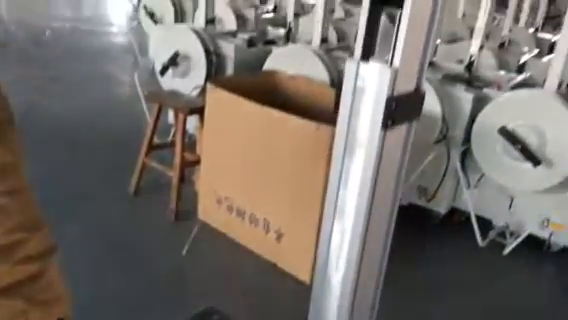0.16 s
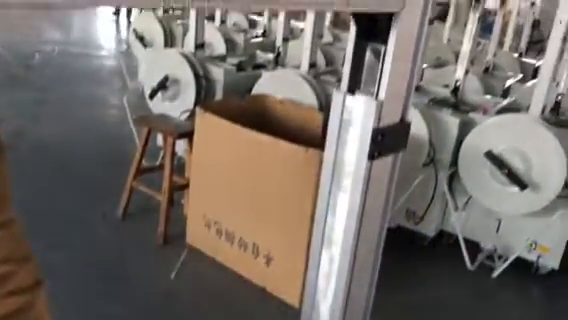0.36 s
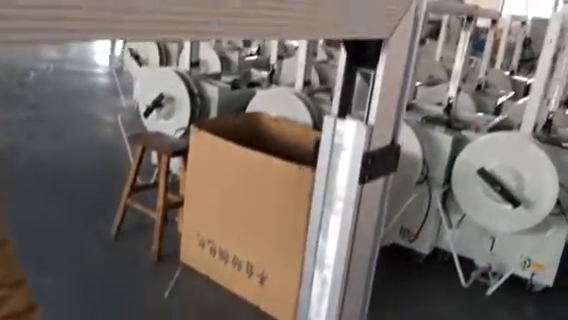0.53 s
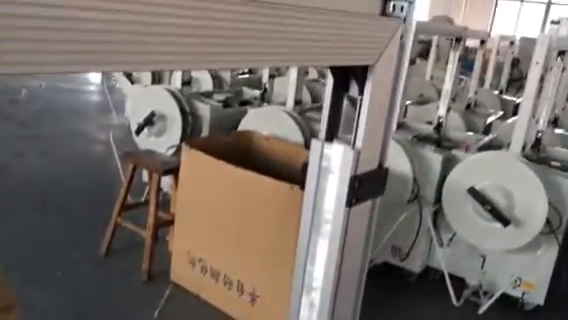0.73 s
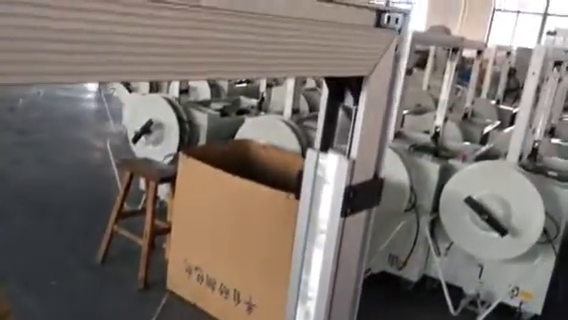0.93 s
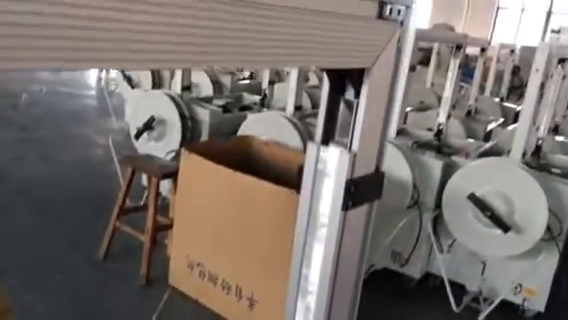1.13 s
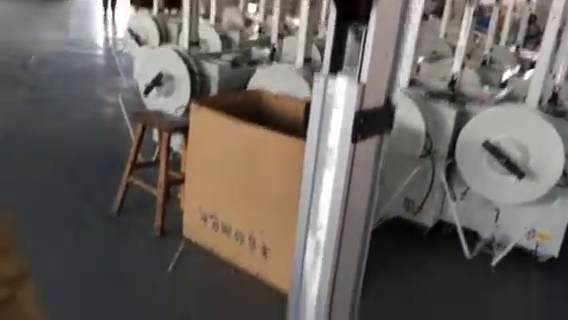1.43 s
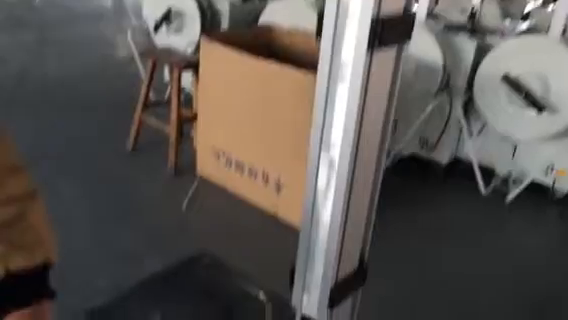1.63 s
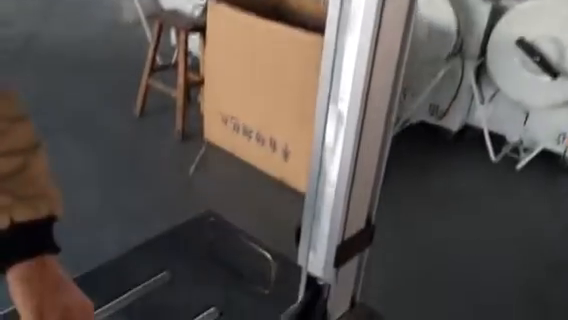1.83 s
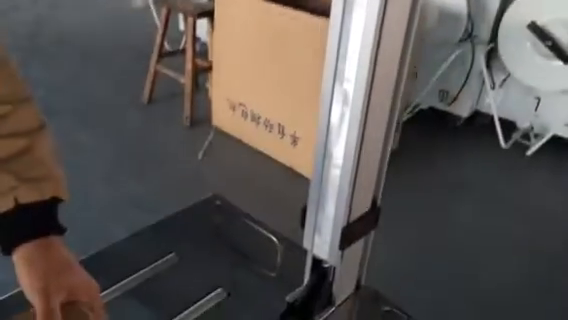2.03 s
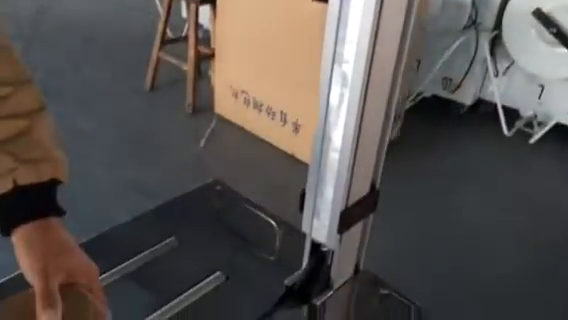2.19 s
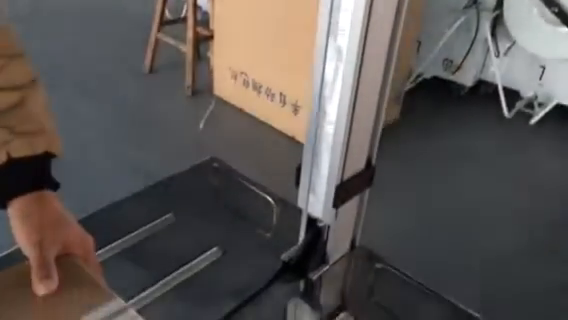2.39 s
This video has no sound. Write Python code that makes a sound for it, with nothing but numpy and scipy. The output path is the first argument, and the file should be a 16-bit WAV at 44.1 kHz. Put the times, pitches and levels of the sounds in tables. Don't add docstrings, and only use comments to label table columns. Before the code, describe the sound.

A strapping machine runs close by in a reverberant workshop with low fan murmur. Latches clack with a heavy thump around 0.2-0.4 s. From 0.45 to 1.05 s a high gear whine and growing strap hiss end in a sharp snap. At 1.27-1.8 s, strap tightens with loud whine, rattle, dense clatter and cracks. Quiet carton bumps and slides follow from 1.95 to 2.35 s.

```python
import sys
import numpy as np
from scipy import signal
from scipy.io import wavfile
from scipy.ndimage import uniform_filter1d

SR = 44100
rng = np.random.default_rng(int(sys.argv[2]) if len(sys.argv) > 2 else 0)


def convert_level_to_amplitude(level_db):
    exponent = np.asarray(level_db, float) / 20
    return 10 ** exponent


def digitize_waveform(pressure):
    field = np.atleast_2d(pressure).T
    bounded = np.clip(field, -1, 1)
    quanta = np.round(bounded * 32767).astype(np.int16)
    wavfile.write(sys.argv[1], SR, quanta)


N = 112454

# time_s [s], mesh_pitch_hz [Hz], level_db [dB]
IDLE_RUN = [(0, 1842, -42.5), (1.3, 1817, -52.5), (1.75, 1836, -35), (1.92, 1831, -37), (2.1, 1827, -35),
            (2.55, 1854, -45.5)]
# time_s [s], mesh_pitch_hz [Hz], level_db [dB]
LOADED_RUNS = [
    [(.43, 1570, -36), (.47, 1780, -31), (.52, 1872, -30.5), (.87, 1850, -32), (.915, 1766, -21.5),
     (.96, 1734, -24), (1.0, 1850, -36), (1.04, 1850, -27), (1.048, 1810, -35)],
    [(1.27, 1530, -30), (1.315, 1770, -17), (1.34, 1717, -28), (1.44, 1820, -20.5), (1.6, 1833, -19.5),
     (1.66, 1858, -23), (1.725, 1857, -21), (1.76, 1724, -28), (1.8, 1723, -33)],
]
# multiple [1], level_db [dB]
MESH_OVERTONES = [(2, -3), (3, -19), (4, -17)]
# frequency_hz [Hz], density_db [dB per Hz]
MURMUR_SPECTRUM = [(76, -42), (130, -9.5), (307, -9), (527, -24.5), (726, -18.5), (1080, -19),
                   (1820, -23.5), (2100, -25), (15500, -57.5)]
# time_s [s], level_db [dB]
RUMBLE_LEVEL = [(0, -44.5), (.35, -42.5), (.6, -42), (1.3, -44.5), (1.6, -42), (1.7, -68), (2.02, -63),
                (2.1, -34), (2.55, -44.5)]
# start_s [s], peak_db [dB], body_db [dB], sizzle_db [dB], length_s [s]
MACHINE_CONTACTS = [(.197, -22, -4.5, -12.5, 0.039), (.252, -26, -3.5, -37, 0.043),
                    (.287, -15, -10.5, -22, 0.036), (.311, -8.5, -4.5, -40, 0.0031),
                    (.388, -8.5, -11, -13.5, 0.033), (.514, -24.5, -19, -6, 0.048),
                    (.637, -23.5, -33, -2.5, 0.009), (.897, -12.5, -24, -19, 0.031),
                    (.937, -12, -43, -21, 0.049), (1.0475, -9.5, -25, -11.5, 0.024),
                    (1.11, -19.5, -14.5, -32, 0.047), (1.146, -16.5, -13.5, -45, 0.019),
                    (1.275, -6.5, -40, -8, 0.05), (1.329, -7, -20, -11, 0.027),
                    (1.354, -5.5, -14, -14.5, 0.013), (1.426, -8, -11, -9.5, 0.02),
                    (1.474, -7, -9.5, -25, 0.024), (1.532, -17, -31, -5, 0.015),
                    (1.552, -5.5, -14, -27, 0.012), (1.579, -4.5, -19, -33, 0.014),
                    (1.626, -18.5, 4.5, -16, 0.0046), (1.7225, -12, 0.5, -22, 0.0043),
                    (1.736, -20.5, 6, -40, 0.0033)]
# frequency_hz [Hz], width_hz [Hz], level_db [dB]
HOUSING_MODES = [(1454, 19, 10.5), (1700, 64, 9), (1850, 660, 2.5), (2536, 92, 9), (2697, 49, 5.5),
                 (2960, 130, 9.5), (3540, 1640, -0.5)]
# start_s [s], level_db [dB], pitch_hz [Hz], length_s [s]
RINGING_PARTS = [(.198, -38.5, 10700, 0.022), (.2, -30.5, 720, 0.034), (0.309, -21, 5460, 0.0046),
                 (0.311, -19.5, 1270, 0.0062), (0.39, -34, 9600, 0.019), (.4, -28.5, 1050, 0.027),
                 (0.515, -30, 7230, 0.006), (0.901, -30, 1650, 0.013), (0.941, -23, 1630, 0.021),
                 (0.944, -32, 2540, .015), (1.056, -38, 2330, 0.013), (1.273, -18, 3870, 0.011),
                 (1.281, -15, 2690, .004), (1.302, -17.5, 5940, 0.0086), (1.308, -24, 4100, .012),
                 (1.314, -18, 8300, .012), (1.326, -30, 2800, .008), (1.359, -19, 2950, 0.0062),
                 (1.355, -30, 5600, 0.0046), (1.364, -23, 3240, .007), (1.409, -20.5, 490, 0.0056),
                 (1.427, -22, 1090, 0.018), (1.43, -18.5, 9670, .012), (1.45, -21.5, 8900, 0.0096),
                 (1.474, -28, 5960, 0.0036), (1.482, -19.5, 1170, 0.012), (1.531, -23.5, 7950, 0.0086),
                 (1.536, -21.5, 2790, .02), (1.548, -17.5, 900, 0.01), (1.551, -22, 1360, 0.011),
                 (1.578, -18.5, 1380, 0.014), (1.596, -42, 10000, .004), (1.627, -26, 5600, 0.0026),
                 (1.739, -18.5, 1400, 0.0052), (1.793, -37.5, 2740, .02), (2.076, -40, 950, 0.022),
                 (2.16, -32.5, 990, .022), (2.236, -28, 994, .015), (2.237, -28, 1480, 0.026),
                 (2.232, -37, 4100, .015), (2.269, -28.5, 950, 0.032), (2.331, -34, 950, .025),
                 (.46, -38.5, 950, 0.081), (0.524, -42, 602, 0.07), (1.249, -36, 760, 0.022),
                 (2.133, -46, 13500, .025), (1.989, -47.5, 7000, 0.014), (2.098, -47, 6500, .015)]
# start_s [s], peak_db [dB], pitch_hz [Hz], t60_s [s]
FRAME_THUMPS = [(0.217, -10, 129, 0.031), (.31, -0.5, 142, 0.038), (0.313, -5, 366, 0.046),
                (.312, -9.5, 695, 0.03), (0.396, -38, 214, 0.05), (1.452, -7.5, 452, 0.019),
                (1.475, -17.5, 470, 0.1), (1.621, -5, 65, 0.059), (1.6251, -6, 149, 0.029),
                (1.713, -9.5, 513, 0.026), (1.737, -10.5, 498, 0.038), (1.74, -20, 157.4, 0.18),
                (1.968, -19.5, 500, 0.03)]
# start_s [s], peak_db [dB], top_hz [Hz]
METAL_SNAPS = [(0.3143, -6.5, 6530), (.5145, -14.5, 13000), (1.0476, -4, 11300), (1.2883, -6, 6000),
               (1.331, -7, 8000), (1.3553, -3.5, 12000), (1.367, -2, 5000), (1.4325, -17, 9000),
               (1.4747, -17, 10000), (1.504, -3, 5000), (1.606, -16, 12000), (1.6258, -10, 11000),
               (1.7232, -6.5, 10800), (1.7358, -11, 10000), (2.325, -34, 8800)]
# time_s [s], level_db [dB]
STRAP_RUNS = [
    [(.43, -44), (.5, -41), (.52, -35), (.7, -32.5), (.9, -30), (1.036, -30), (1.044, -41), (1.11, -44),
     (1.21, -63)],
    [(1.22, -41), (1.268, -30), (1.278, -21.5), (1.37, -26.5), (1.41, -26.5), (1.58, -27.5), (1.64, -34.5),
     (1.74, -36), (1.82, -46.5)],
]
# frequency_hz [Hz], density_db [dB per Hz]
HISS_SPECTRUM = [(180, -38), (300, -33), (348, -35), (620, -7), (731, -17.5), (1780, -7.5), (2360, -8.5),
                 (3690, -12), (15500, -9)]
# frequency_hz [Hz], density_db [dB per Hz]
RATTLE_SPECTRUM = [(180, -29), (300, -18), (985, -9), (1840, -7.5), (2280, -10), (3630, -9.5), (4880, -14),
                   (9140, -13.5), (15500, -19.5)]
# start_s [s], peak_db [dB], body_db [dB], sizzle_db [dB], length_s [s]
CARTON_CONTACTS = [
    (1.959, -20.5, -38, -15.5, 0.02),
    (1.99, -22, -13, -18, 0.019),
    (2.064, -18.5, -8.5, -16, 0.046),
    (2.098, -20, -12.5, -15.5, 0.035),
    (2.135, -24, -7.5, -10, 0.024),
    (2.16, -18.5, -7, -21, 0.017),
    (2.229, -11, -18, -22, 0.041),
    (2.267, -29, 0, -34, 0.017),
    (2.32, -16.5, -11.5, -25, 0.013),
]
# frequency_hz [Hz], width_hz [Hz], level_db [dB]
TABLE_MODES = [(950, 93, 0.5), (1433, 30, 5), (1510, 44, 1.5), (1984, 17, 5)]

SHAFT_HZ, ECCENTRIC, MESH_JITTER_HZ, MESH_FLUTTER_DB = 58.5, .25, 8, 1.2
FULL_SPEED_HZ, SPEED_WIDTH_HZ = 1868, 20
MURMUR_DB, DUCK_FROM_DB, DUCK_RATIO, DUCK_HZ = -34.5, -28.5, 0.35, 1.3
GRAINS_PER_S, GRAIN_SPREAD_DB, PATCH_DB = 14000, 1.5, 4
CREST_DB, SAG_DB, RELEASE_T60_S = 10.5, 4.5, 0.095
RING_WIDTH_SHARE, RING_T60_S, SNAP_T60_S, SNAP_LOW_HZ = .13, .03, .016, 900
HALL_T60_S, HALL_DB, HALL_GAP_S, WALL_CUT_HZ = 0.63, -14.5, 0.0026, 8800


def unit(x):
    return x / np.sqrt(np.mean(x ** 2) + 1e-20)


def drift(rate_hz):
    settle = 9000
    r = np.exp(-2 * np.pi * rate_hz / SR)
    wander = signal.lfilter([1], [1, -2 * r, r * r], rng.standard_normal(N + settle))
    return unit(wander[settle:])


def band(x, low_hz, high_hz):
    return signal.sosfilt(signal.butter(2, [low_hz, high_hz], "band", fs=SR, output="sos"), x)


def contour(t, run):
    return convert_level_to_amplitude(np.interp(t, *np.transpose(run), left=-120, right=-120))


def coloured(spectrum, patchy_db):
    hz, db = np.transpose(spectrum)
    edges = 28 * 2 ** np.arange(0, 9.6, .5)
    white = rng.standard_normal((2, N))
    together, own = drift(5), drift(15)
    out = 0
    for k, (low, high) in enumerate(zip(edges, edges[1:])):
        level_db = np.interp(np.log(low * high) / 2, np.log(hz), db)
        flicker = .5 * together + np.roll(own, 5000 * k)
        out = out + convert_level_to_amplitude(level_db + patchy_db * flicker) * band(white[k % 2], low, high)
    return unit(out)


def resonate(x, modes):
    out = 0
    for k, (hz, width_hz, db) in enumerate(modes):
        r = np.exp(-np.pi * width_hz / SR)
        zeros = [(1 - r * r) / 2, 0, (r * r - 1) / 2]
        poles = [1, -2 * r * np.cos(2 * np.pi * hz / SR), r * r]
        out = out + (-1) ** k * convert_level_to_amplitude(db) * signal.lfilter(zeros, poles, x)
    return out


def gears(run, sway, rough, over_db):
    s, hz, db = np.transpose(run)
    t = np.arange(N) / SR
    mesh_hz = np.interp(t, s, hz)
    shaft = 2 * np.pi * np.cumsum(SHAFT_HZ * (1 + 0.027 * drift(7.15))) / SR
    mesh = 2 * np.pi * np.cumsum(mesh_hz + MESH_JITTER_HZ * drift(57.5)) / SR
    sway_phase = sway * np.sin(shaft)
    swayed = mesh + sway_phase
    throb = 1 + ECCENTRIC * np.cos(shaft + 1)
    tone = throb * convert_level_to_amplitude(MESH_FLUTTER_DB * drift(53)) * np.sin(swayed)
    worn = drift(150) * np.sin(swayed) + drift(146) * np.cos(swayed)
    tone = unit(tone + rough * worn)
    slack_db = np.minimum(((FULL_SPEED_HZ - mesh_hz) / SPEED_WIDTH_HZ) ** 2, 14)
    for multiple, level_db in MESH_OVERTONES:
        overtone = (1 + .5 * drift(180)) * np.sin(multiple * mesh + sway_phase)
        tone = tone + convert_level_to_amplitude(level_db + over_db - slack_db) * overtone
    return convert_level_to_amplitude(np.interp(t, s, db, left=-120, right=-120)) * tone


def drive():
    idle = gears(IDLE_RUN, sway=.9, rough=.5, over_db=-16)
    feed = gears(LOADED_RUNS[0], sway=2.3, rough=1.8, over_db=-2)
    pull = gears(LOADED_RUNS[1], sway=.9, rough=.5, over_db=0)
    return idle + feed + pull


def murmur(machine):
    r = np.exp(-2 * np.pi * DUCK_HZ / SR)
    loud_db = 10 * np.log10(signal.lfilter([1 - r], [1, -r], machine ** 2) + 1e-9)
    duck_db = -DUCK_RATIO * np.clip(loud_db - DUCK_FROM_DB, 0, 40)
    return convert_level_to_amplitude(MURMUR_DB + duck_db) * coloured(MURMUR_SPECTRUM, patchy_db=2.0)


def rumble():
    low = band(band(rng.standard_normal(N), 51, 190), 27, 240)
    level_db = np.interp(np.arange(N) / SR, *np.transpose(RUMBLE_LEVEL))
    return convert_level_to_amplitude(level_db + 2.0 * drift(22)) * unit(low)


def contacts(events, modes, ring_db, attack_s):
    t = np.arange(N) / SR
    grains = (rng.random(N) < GRAINS_PER_S / SR) * rng.standard_normal(N)
    grains = grains * convert_level_to_amplitude(GRAIN_SPREAD_DB * np.minimum(rng.exponential(1, N), 3))
    lumps = drift(102)
    grains = grains * convert_level_to_amplitude(2 * lumps)
    patch = [convert_level_to_amplitude(PATCH_DB * uniform_filter1d(np.roll(lumps, N // n), size=300)) for n in (3, 5)]
    body = unit(band(grains, 197, 1510))
    middle = unit(band(grains, 810, 4140))
    middle = unit(middle + convert_level_to_amplitude(ring_db) * unit(resonate(grains, modes)))
    sizzle = patch[0] * band(grains, 2560, 8600) + 0.87 * patch[1] * band(grains, 7600, 21200)
    parts = body, middle, unit(sizzle)
    powers = np.zeros((3, N))
    for s, db, body_db, sizzle_db, length in events:
        age = t - s
        sag_db = SAG_DB * np.clip(age / length, 0, 1)
        release_db = 60 * np.clip(age - length, 0, 1) / RELEASE_T60_S
        shape = np.clip(age / attack_s, 0, 1) * convert_level_to_amplitude(-sag_db - release_db)
        part_db = db + np.array([[body_db], [-CREST_DB], [sizzle_db]])
        powers += (convert_level_to_amplitude(part_db) * shape) ** 2
    return np.sum(np.sqrt(powers) * parts, axis=0)


def clatter():
    return contacts(MACHINE_CONTACTS, HOUSING_MODES, ring_db=7.5, attack_s=0.00041)


def rings():
    out, t = np.zeros(N + SR), np.arange(SR // 10) / SR
    shakes = rng.standard_normal((len(RINGING_PARTS), len(t)))
    for (s, db, hz, length), shake in zip(RINGING_PARTS, shakes):
        mode = [(hz, 40 + RING_WIDTH_SHARE * hz, 0)]
        decay_db = 60 * np.clip(t - length, 0, 1) / RING_T60_S
        shape = np.clip(t / .001, 0, 1) * convert_level_to_amplitude(db - decay_db)
        i = int(s * SR)
        out[i:i + len(t)] += shape * unit(resonate(resonate(shake, mode), mode))
    return out[:N]


def thumps():
    out, t = np.zeros(N), np.arange(N) / SR
    for s, db, hz, t60 in FRAME_THUMPS:
        age = np.clip(t - s, 0, 1)
        onset = 1 - np.exp(-age * hz * 3)
        out += convert_level_to_amplitude(db - 60 * age / t60) * onset * np.sin(2 * np.pi * hz * age)
    return out


def snaps():
    out, t = np.zeros(N + SR), np.arange(SR // 20) / SR
    white = rng.standard_normal(N)
    for s, db, top_hz in METAL_SNAPS:
        i = int(s * SR)
        crack = convert_level_to_amplitude(db - 60 * t / SNAP_T60_S) * white[i:i + len(t)]
        out[i:i + len(t)] += band(crack, SNAP_LOW_HZ, top_hz)
    return out[:N]


def strap():
    t = np.arange(N) / SR
    feed, pull = (uniform_filter1d(contour(t, run), size=100) for run in STRAP_RUNS)
    hiss = feed * coloured(HISS_SPECTRUM, patchy_db=1.66)
    rattle = pull * convert_level_to_amplitude(2.86 * drift(113)) * coloured(RATTLE_SPECTRUM, patchy_db=2.5)
    return convert_level_to_amplitude(5.5) * (hiss + rattle)


def carton():
    return contacts(CARTON_CONTACTS, TABLE_MODES, ring_db=0.5, attack_s=.007)


def hall(x):
    t = np.arange(SR // 2) / SR
    tail = rng.standard_normal(len(t)) * convert_level_to_amplitude(-60 * t / HALL_T60_S)
    tail = band(tail * np.clip(t / HALL_GAP_S - .3, 0, 1), 183, WALL_CUT_HZ)
    return signal.fftconvolve(x, tail / np.sqrt(np.sum(tail ** 2)))[:N]


def scene():
    machine = drive() + clatter() + thumps() + snaps() + strap() + carton()
    room = convert_level_to_amplitude(HALL_DB) * hall(machine)
    return (machine + room + murmur(machine) + rumble() + rings())[None]


def band_limit(x):
    return signal.sosfilt(signal.butter(12, 16480, fs=SR, output="sos"), x)


def record(dry):
    x = 0.8 * np.tanh(dry / 1.006)
    x = signal.sosfilt(signal.butter(2, 45, "high", fs=SR, output="sos"), x)
    x = signal.sosfilt(signal.cheby2(12, 45, 15600, fs=SR, output="sos"), x)
    return band_limit(x)


dry = scene()
out = record(dry)
digitize_waveform(out)
```